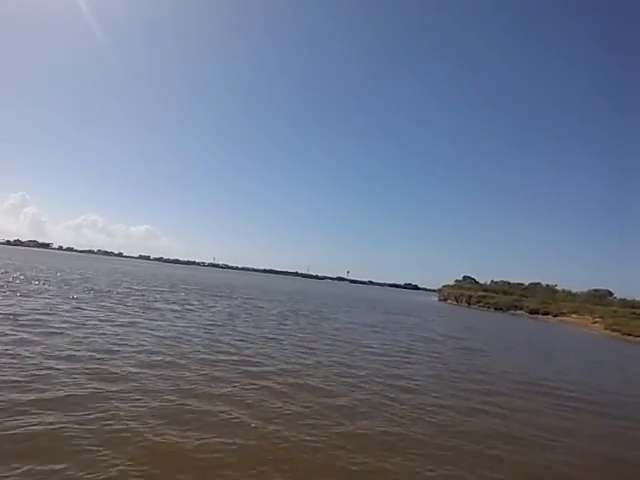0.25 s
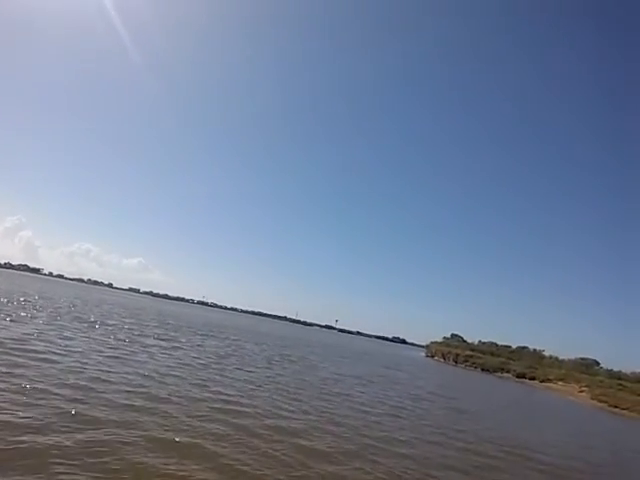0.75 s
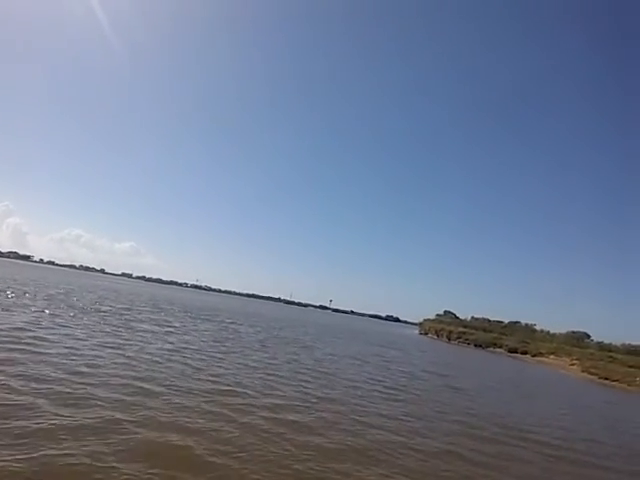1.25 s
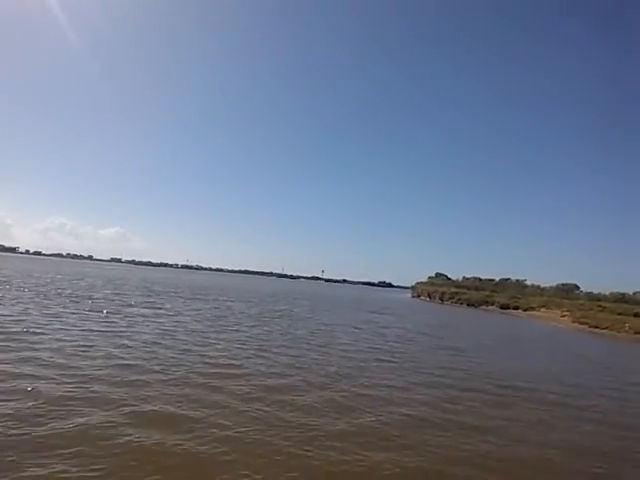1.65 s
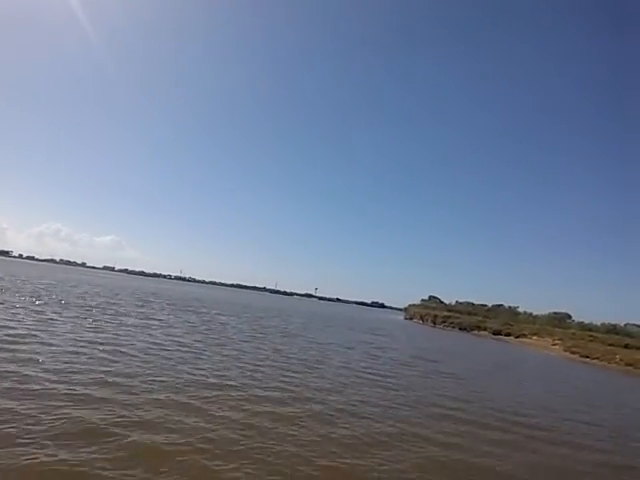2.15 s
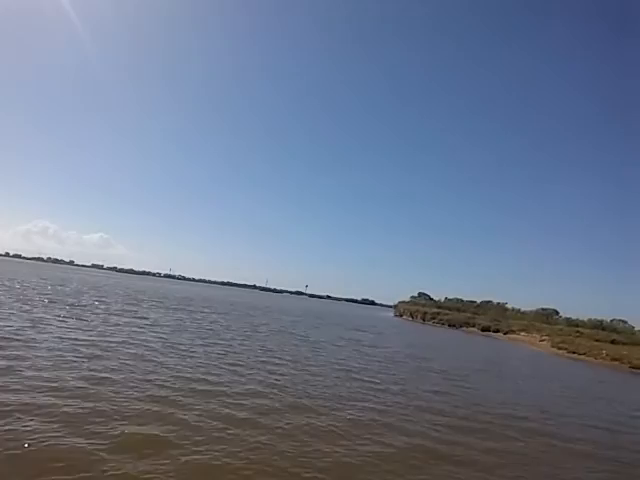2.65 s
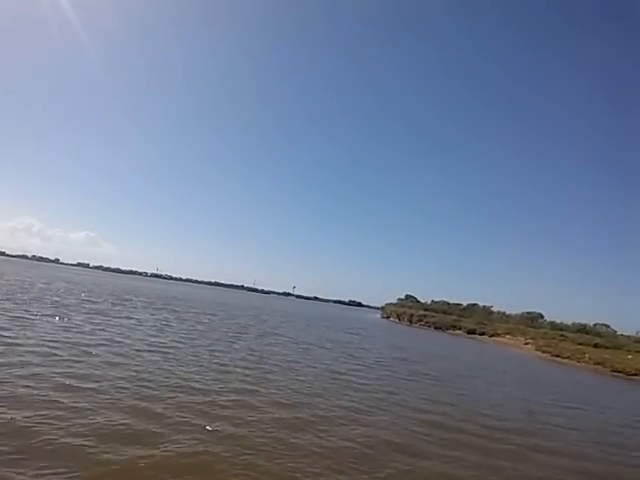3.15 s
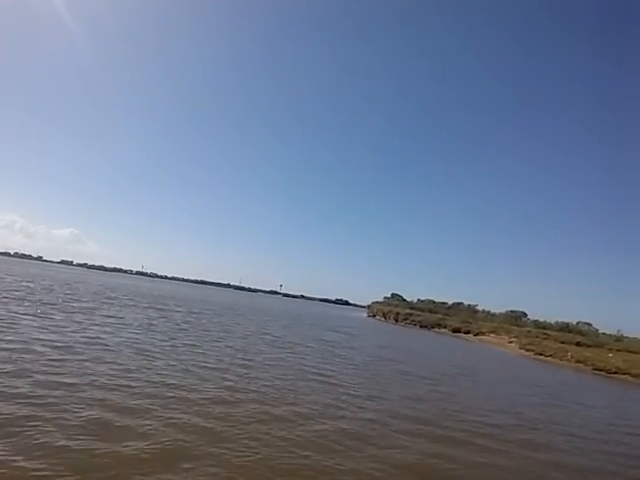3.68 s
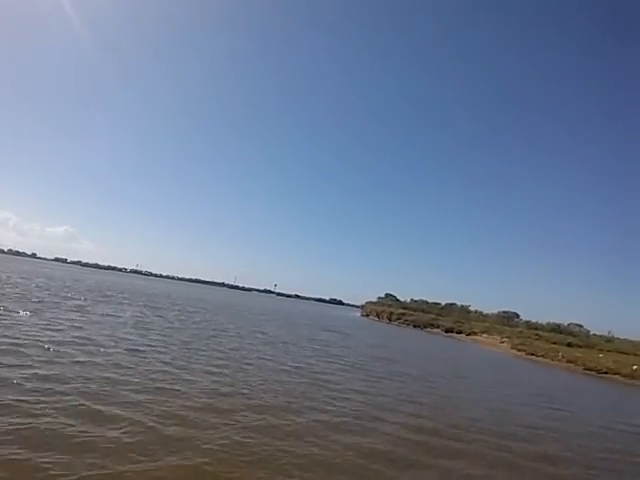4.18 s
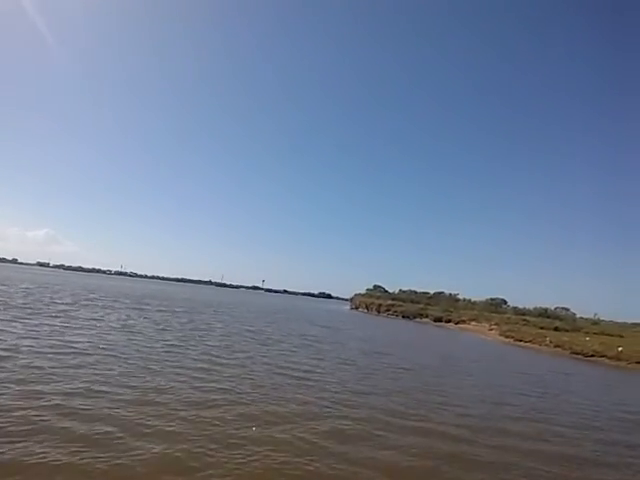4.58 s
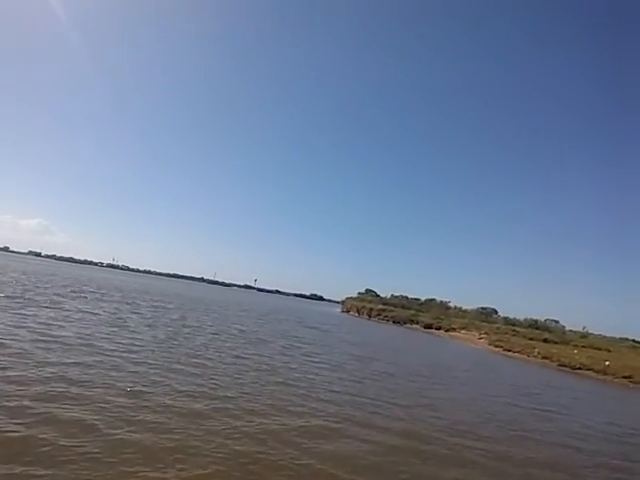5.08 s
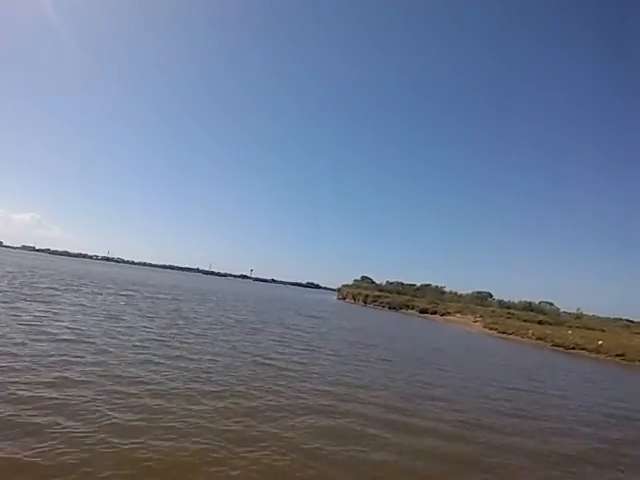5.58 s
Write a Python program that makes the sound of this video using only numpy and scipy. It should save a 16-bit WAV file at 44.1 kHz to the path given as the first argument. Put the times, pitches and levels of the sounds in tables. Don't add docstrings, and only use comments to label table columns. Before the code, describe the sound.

Low wind puffs buffet a close microphone while sharp metallic clicks and dull gear knocks break out on a hollow plastic kayak.

```python
import sys
import numpy as np
from scipy import signal
from scipy.io import wavfile
from scipy.ndimage import uniform_filter1d

SR = 44100
rng = np.random.default_rng(int(sys.argv[2]) if len(sys.argv) > 2 else 0)


def gain_from_db(level_db):
    decades = np.asarray(level_db, float) / 20
    return 10 ** decades


def wav_record(signal):
    frames = np.transpose(np.atleast_2d(signal))
    bounded = np.clip(frames, -1, 1)
    quanta = np.round(bounded * 32767).astype(np.int16)
    wavfile.write(sys.argv[1], SR, quanta)


N = 256750

# time_s, level_db
BREEZE = [(0.0, -34), (0.14, -36), (0.39, -35.5), (0.91, -32.5), (1.77, -37), (2.01, -35), (2.56, -33.5),
          (3.16, -36.5), (3.4, -37.5), (3.65, -34.5), (3.82, -38.5), (4.07, -36.5), (4.21, -33),
          (4.72, -32.5), (5.15, -34.5), (5.4, -37), (5.69, -30.5), (5.82, -31.5)]


def evened(x):
    return x / np.sqrt(np.mean(x ** 2) + 1e-20)


def add(mix, start_s, sound):
    part = mix[round(start_s * SR):][:len(sound)]
    part += sound[:len(part)]


def noise(colour, patchy_db, flicker_db, size):
    hop = size // 4
    hz = np.fft.rfftfreq(size, 1 / SR)
    real, imaginary, patches = rng.standard_normal((N // hop + 5, len(hz), 3)).T
    patches = uniform_filter1d(patches, size=5, axis=0)
    patches = evened(uniform_filter1d(patches, size=6, axis=1))
    flicker = evened(uniform_filter1d(rng.standard_normal(real.shape[1]), size=4))
    colour_hz, colour_db = np.transpose(colour)
    shape_db = np.interp(np.log(hz + 1), np.log(colour_hz + 1), colour_db, left=-90, right=-90)[:, None]
    level_db = shape_db + patchy_db * patches + flicker_db * flicker
    spectra = (real + 1j * imaginary) * gain_from_db(level_db)
    return evened(signal.istft(spectra, nperseg=size, noverlap=size - hop)[1][:N])


def struck(modes_hz, modes, rise_s, spread_db, scatter=1):
    t = np.arange(SR // 6) / SR
    out = np.zeros(len(t))
    chances = rng.random((len(modes), 2))
    for hz, (mode_db, t60_s), (phase, luck) in zip(modes_hz, modes, chances):
        level = gain_from_db(mode_db + spread_db * (2 * luck - 2.5) - 60 * t / t60_s)
        out += level * np.sin(2 * np.pi * (hz * t + scatter * phase))
    return out * np.sin(np.pi / 2 * np.clip(t / rise_s, 0, 1)) ** 2


def broad(x, hz, sharpness):
    for _ in range(2):
        x = signal.lfilter(*signal.iirpeak(hz, sharpness, SR), x)
    return x / abs(x).max()


def water_hiss():
    # pitch_hz, level_db (per Hz)
    hiss_colour = [(530, -48), (900, 2), (1460, -15.5), (1810, -10), (2100, -20.5), (2770, -14),
                   (4080, -20), (4780, -18.5), (7380, -22.5), (9400, -30), (15100, -22), (15600, -23),
                   (16200, -29)]
    return gain_from_db(-55.5) * noise(hiss_colour, patchy_db=0.7, flicker_db=1.0, size=1024)


def squeaks():
    # start_s, level_db, start_hz, end_hz, length_ms
    glides = [(1.175, -51, 2800, 2830, 35), (1.180, -46, 1020, 950, 30), (1.318, -38, 1700, 1630, 12),
              (1.350, -43, 1270, 1226, 52), (1.362, -29, 610, 580, 11), (1.368, -46, 2430, 2310, 50),
              (1.560, -43, 1380, 1320, 20), (1.598, -36.5, 990, 970, 21), (1.605, -41.5, 1210, 1370, 42),
              (1.640, -39, 830, 805, 20), (2.598, -59, 5500, 5480, 32)]
    out = np.zeros(N)
    for start_s, level_db, start_hz, end_hz, length_ms in glides:
        hz = np.linspace(start_hz, end_hz, round(length_ms * SR / 1000))
        waver = uniform_filter1d(rng.standard_normal(4000), size=150)[:len(hz)]
        hz = hz * (1 + 0.12 * waver)
        tone = np.sin(2 * np.pi * np.cumsum(hz) / SR)
        add(out, start_s, gain_from_db(level_db) * np.hanning(len(hz)) * tone)
    return out


def strap():
    # pitch_hz, level_db (per Hz)
    rub_colour = [(410, -25), (700, 1), (898, -2), (984, -4.5), (1280, -6), (1800, -9), (1940, -13),
                  (2190, -7.5), (2400, -11), (7010, -12), (9230, -23), (16000, -29)]
    # fastest_s, peak_db, rise_s, fall_s, dull_db (relative)
    strokes = [(.1, -66, .1, 0.069, 6), (.66, -55.5, .05, 0.053, -14), (.8, -63, .08, .1, -12),
               (1.09, -46.5, 0.11, 0.037, -2), (1.25, -51.5, 0.14, 0.25, -4), (1.4, -51, 0.17, 0.12, 2.5),
               (1.58, -54, 0.36, 0.48, 1.5), (2.34, -52, 0.13, 0.11, 0.5), (2.42, -45, 0.12, 0.12, -4),
               (2.48, -47, 0.11, 0.076, -4), (2.525, -53.5, .06, 0.028, 3), (4.088, -60, .012, .015, -8),
               (4.235, -43, 0.016, .04, -2), (4.258, -44.5, .04, .018, 1.5),
               (4.31, -52.5, 0.088, 0.12, 5.5), (5.69, -63, 0.52, .07, 2)]
    drop_db, bend = -18, 1.34
    creep_db, creep_dull_db = -71, 7
    slips = noise(rub_colour, patchy_db=0.0, flicker_db=1.0, size=256)
    dull = signal.sosfilt(signal.butter(2, 4300, fs=SR, output="sos"), slips)
    t = np.arange(N) / SR
    fine = gain_from_db(2 * creep_db)
    pressed = gain_from_db(2 * (creep_db + creep_dull_db))
    for fastest_s, peak_db, rise_s, fall_s, dull_db in strokes:
        away = abs(t - fastest_s) / np.where(t < fastest_s, rise_s, fall_s)
        power = gain_from_db(2 * (peak_db + drop_db * away ** bend))
        fine = fine + power
        pressed = pressed + power * gain_from_db(2 * dull_db)
    return gain_from_db(7.5) * (np.sqrt(fine) * (slips - dull) + np.sqrt(pressed) * dull)


def gear():
    # start_s, peak_db, thud_hz, edge_db (relative), t60_s (time to fade by 60 dB)
    knocks = [(0.641, -38, 1300, -25, .03), (.871, -58, 1500, 13, .015), (0.898, -35, 1850, -37, 0.014),
              (.907, -50, 2000, -9, .012), (1.310, -34, 1650, 9, 0.021), (1.460, -30, 1540, -18, 0.017),
              (1.910, -41.5, 2290, -9, 0.016), (2.189, -39, 2500, -8, .015), (2.363, -17, 770, -5, 0.067),
              (2.365, -19, 2740, 0, 0.031), (4.19, -30, 1040, -19.5, 0.022), (4.205, -57, 1000, 18, 0.018),
              (4.219, -31, 2500, -5, 0.03), (4.2659, -14.5, 1270, -5, 0.021),
              (4.3104, -13, 1540, 0.5, 0.0067), (4.3136, -20.5, 3700, 11.5, 0.014),
              (4.316, -20, 2500, -13, 0.037), (4.331, -25, 1010, -8, 0.014),
              (5.242, -36.5, 1770, -37, 0.019), (5.326, -38.5, 1300, -2.2, 0.017),
              (5.499, -38, 2500, -18, 0.02)]
    # start_s, peak_db, thud_hz, edge_db (relative), t60_s
    bumps = [(0.855, -31.5, 1540, -26, 0.023), (1.349, -24, 700, -14, 0.04),
             (2.3652, -21.5, 1310, -4, 0.019), (2.373, -19.5, 980, -8, 0.05),
             (4.2677, -9.5, 1400, -10.5, 0.018), (4.271, -19, 810, -0.5, 0.061),
             (5.590, -43.5, 1200, 12.5, 0.037)]
    out, t = np.zeros(N), np.arange(SR // 10) / SR
    blows = [(*row, 5700) for row in knocks] + [(*row, 2440) for row in bumps]
    for start_s, peak_db, thud_hz, edge_db, t60_s, edge_hz in blows:
        fade_s = max(t60_s, 0.004)
        rattle = rng.standard_normal(len(t)) * gain_from_db(-60 * t / fade_s) * np.clip(t / 0.00017, 0, 1)
        rattle += 0.036 * rng.standard_normal(len(t)) * gain_from_db(-15 * t / fade_s)
        rattle[12] -= 6.5
        thud = broad(rattle, thud_hz, sharpness=1.1)
        edge = broad(rattle, edge_hz, sharpness=2.2)
        add(out, start_s - 0.0004, gain_from_db(peak_db) * (thud + gain_from_db(edge_db) * edge))
    return signal.sosfilt(signal.butter(3, 8500, fs=SR, output="sos"), out)


def fitting():
    # start_s, peak_db, then relative levels seat_db, bright_db, hull_db
    clicks = [
        (1.2595, -35, 2, -1, -21),
        (1.2849, -8, 4.5, -2.5, -11),
        (1.2934, -21, 7, 0.5, -2),
        (1.7177, -5, -3, 1, -15),
        (1.72199, -5, 1, -1, -12),
        (3.0024, -5, -2, -6, -8),
        (3.5272, -6.5, -7.5, -9, -21),
        (4.6006, -22, 2.5, -12, -21),
        (5.2991, -21, 5.5, -6.5, -11.5),
        (5.7729, -3, -2.5, -4, -11.5),
    ]
    snap_hz, snap_modes = [5140, 5340, 3300, 2740], [(4.5, 0.038), (1, 0.024), (-21, 0.033), (-11.5, 0.0304)]
    ring_hz, ring_modes = [4867, 4619, 2998, 7740, 8059, 6430], [(-13, 0.077), (-18, 0.041), (-35, 0.09), (-33, 0.078),
                                            (-36, 0.09), (-44, 0.052)]
    bright_hz, bright_modes = [6430, 7030, 7520, 7940, 8720], [(-1.5, .016), (-1, 0.018), (7.5, 0.0069), (-15, 0.024),
                                                  (-15, 0.0076)]
    glance_hz, glance_modes = [2560, 3990, 9890, 10450, 10680, 10900, 13000, 14800], [(4.5, 0.0097), (-19, 0.054), (-49, .15), (-45, 0.18),
                                                  (-41, 0.065), (-13, 0.015), (-28, .008), (-27, 0.0099)]
    hull_hz, hull_modes = [615, 832, 465], [(2.5, 0.064), (-1, 0.051), (-1.5, 0.049)]
    seat_modes = [(4.5, 0.017), (-11.0, 0.033), (-15.5, 0.027)]
    out, t = np.zeros(N), np.arange(SR // 6) / SR
    crack_band = signal.butter(3, [1600, 8600], "band", fs=SR, output="sos")
    for start_s, peak_db, seat_db, bright_db, hull_db in clicks:
        seat_hz = (1767 - 19.5 * bright_db) * np.array([1, 0.92, 1.05])
        seat = struck(seat_hz, seat_modes, rise_s=0.0015, spread_db=3.0)
        snap = struck(snap_hz, snap_modes, rise_s=0.0021, spread_db=1.1, scatter=0.05)
        snap *= 0.087 + 0.86 * np.cos(np.pi / 2 * np.clip((t - 0.0022) / 0.00178, 0, 1))
        ring = struck(ring_hz, ring_modes, rise_s=0.0012, spread_db=1.1, scatter=0.05)
        bright = struck(bright_hz, bright_modes, rise_s=0.00056, spread_db=3.5)
        glance = struck(glance_hz, glance_modes, rise_s=0.0005, spread_db=1.5)
        hull = struck(hull_hz, hull_modes, rise_s=0.00054, spread_db=3.5)
        crack = signal.sosfilt(crack_band, rng.standard_normal(len(t)) * gain_from_db(-60 * t / 0.022))
        crack *= np.clip(t / 0.0018, 0, 1)
        sound = snap - ring
        sound += gain_from_db(seat_db) * seat
        sound += gain_from_db(bright_db) * bright
        sound += gain_from_db(3.0 * bright_db) * glance
        sound += gain_from_db(hull_db + 2.5) * hull
        sound += gain_from_db(bright_db - 1.5) * crack
        add(out, start_s - 0.0003, gain_from_db(peak_db) * sound)
    return out


def eddies():
    # crest_s, peak_db, swing_hz, length_ms
    puffs = [(1.017, -15, 576, 5.5), (1.02, -23, 247, 10), (1.027, -14, 189, 8.1), (1.03, -16.5, 328, 14.4),
             (1.042, -12, 288, 4.3), (1.057, -16, 286, 3.3), (1.249, -18.5, 298, 7.2),
             (1.356, -25.5, 550, 18), (1.386, -13.5, 206, 7), (1.544, -17, 198, 2.1),
             (2.399, -17, 220, 8.6), (2.457, -20, 297, 3.9), (2.496, -10, 264, 3.7), (2.653, -14.5, 210, 4),
             (2.885, -13.5, 218, 11), (2.894, -18.5, 195, 7.8), (2.899, -24.5, 526, 3.3),
             (2.902, -14, 164, 11), (3.111, -15, 213, 3.7), (3.186, -12, 166, 4.8), (4.496, -18, 294, 7.5),
             (4.507, -6.5, 295, 5.2), (4.609, -16.5, 160, 8.4), (5.061, -20, 430, 3.1),
             (5.068, -7.5, 137, 6.6), (5.076, -18.5, 324, 2), (5.44, -17, 187, 8.7),
             (5.468, -13.5, 250, 4.1), (5.717, -13, 174, 5.5), (5.802, -13, 231, 4.6)]
    # crest_s, peak_db, swing_hz
    light = [(.101, -29, 460), (.388, -23.5, 235), (.494, -24.5, 178), (.653, -22, 203), (.82, -21, 173),
             (.872, -21, 152), (.932, -22.5, 397), (1.082, -22.5, 227), (1.142, -22, 155),
             (1.441, -27, 190), (1.601, -21.5, 150), (2.653, -25.5, 530), (2.056, -25, 206),
             (2.222, -26, 142), (2.434, -28, 127), (2.69, -18, 147), (3.051, -22, 174), (3.126, -23, 170),
             (3.296, -24, 207), (4.009, -23, 197), (4.103, -24.5, 160), (4.284, -19.5, 155),
             (4.429, -17, 156), (4.54, -20, 368), (4.688, -21.5, 146), (4.797, -20.5, 132),
             (5.033, -21.5, 131), (5.172, -18.5, 154), (5.683, -21, 160), (5.727, -21, 307)]
    place, size, tone = rng.random((40, 3)).T
    crest_s = 0.05 + place * (N / SR - 0.1)
    peak_db = np.interp(crest_s, *np.transpose(BREEZE)) + 5 + 3.5 * (2 * size - 1)
    swing_hz = 160 * (1 + 0.18 * (2 * tone - 1))
    light = list(light) + list(zip(crest_s, peak_db, swing_hz))
    return list(puffs) + [(s, db, hz, 1000 * 1.25 / hz) for s, db, hz in light]


def wind():
    # pitch_hz, level_db (per Hz)
    breeze_colour = [(15, -69), (25, -39), (41, -27.5), (96, 3), (312, -8), (425, -14), (477, -16.5),
                     (601, -18.5), (715, -23.5), (818, -27.5), (1110, -32.5), (2500, -41), (3250, -56),
                     (5500, -120)]
    breeze_db = np.interp(np.arange(N) / SR, *np.transpose(BREEZE))
    out = gain_from_db(breeze_db + 0.87) * noise(breeze_colour, patchy_db=2.0, flicker_db=2.0, size=1024)
    t = np.arange(-1500, 1500) / SR
    rows = eddies()
    chances = rng.uniform(-0.96, 1, (len(rows), 3))
    for (crest_s, peak_db, swing_hz, length_ms), (phase, glide, kink) in zip(rows, chances):
        turn = 2 * np.pi * swing_hz * t * (1 + 5.0 * glide * t) + 1.1 * phase
        swell = np.exp(-(t * 1000 / (0.56 * length_ms)) ** 2)
        wiggle = 0.42 * np.cos((1.62 + 0.76 * kink) * turn) * np.exp(-(1.5 * swing_hz * t) ** 2)
        add(out, crest_s + t[0], gain_from_db(peak_db - 1.5) * swell * (np.cos(turn) + wiggle))
    return out


def scene():
    return (water_hiss() + squeaks() + strap() + gear() + fitting() + wind())[None]


def band_limit(x):
    return signal.sosfilt(signal.butter(12, 16850, fs=SR, output="sos"), x)


def record(dry):
    cut = signal.sosfilt(signal.butter(3, 68, "high", fs=SR, output="sos"), dry)
    limit = 0.9
    held = limit * np.tanh(cut / limit)
    held = signal.oaconvolve(held, signal.firwin(255, 16300, fs=SR)[None], "same")
    return band_limit(held)


dry = scene()
out = record(dry)
wav_record(out)
```